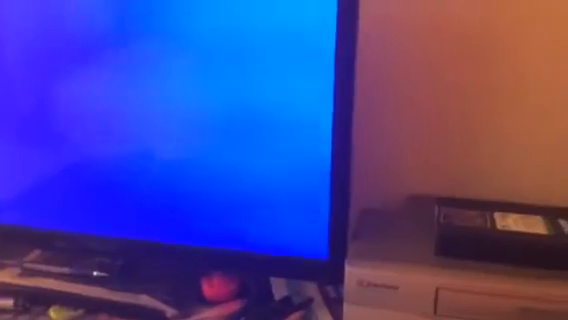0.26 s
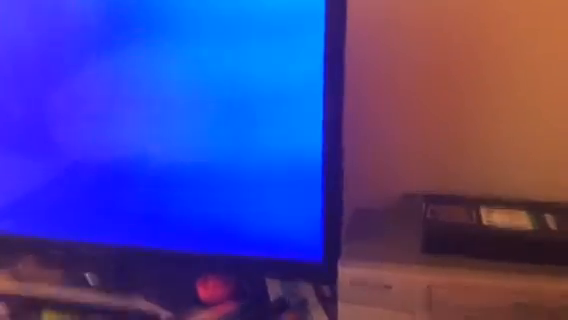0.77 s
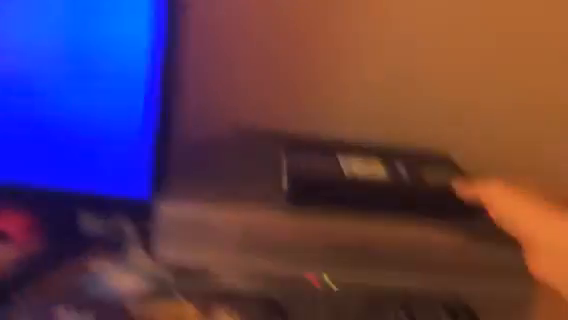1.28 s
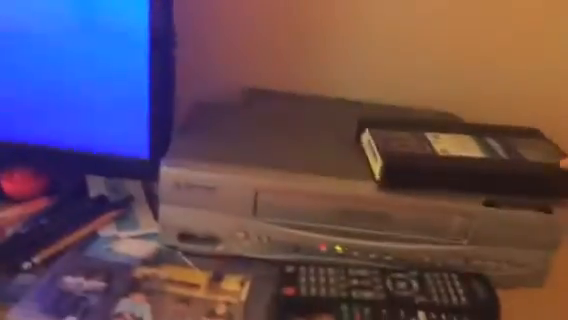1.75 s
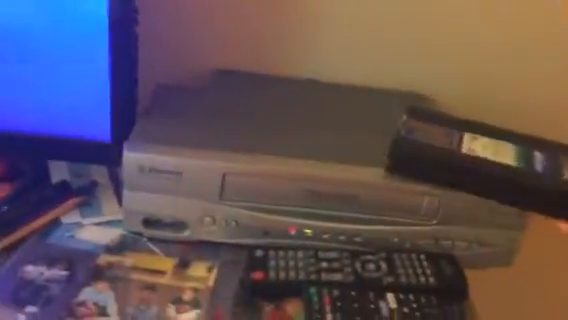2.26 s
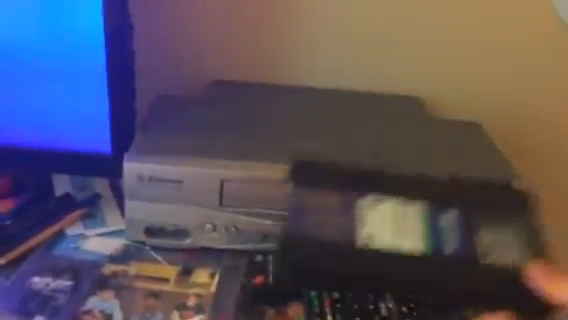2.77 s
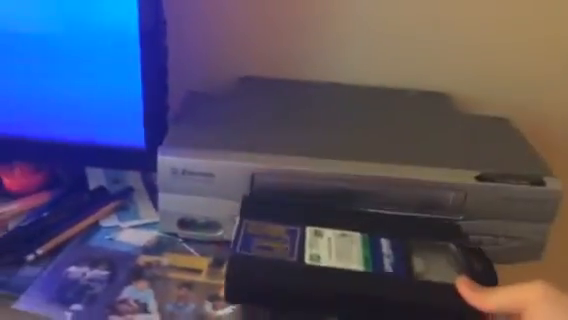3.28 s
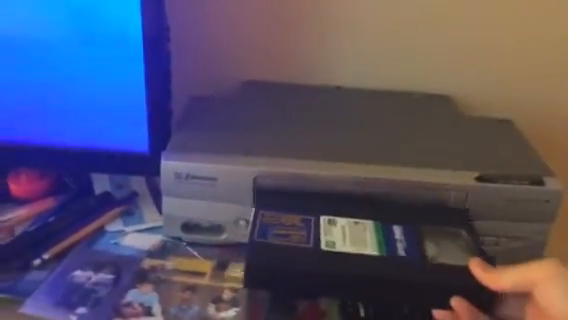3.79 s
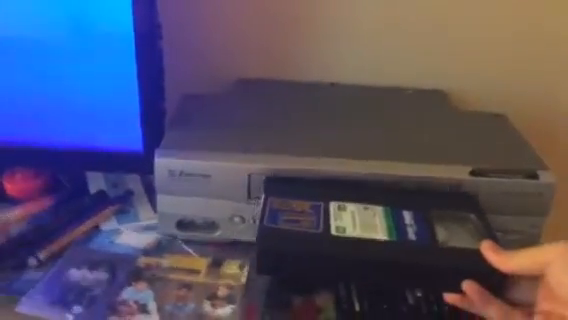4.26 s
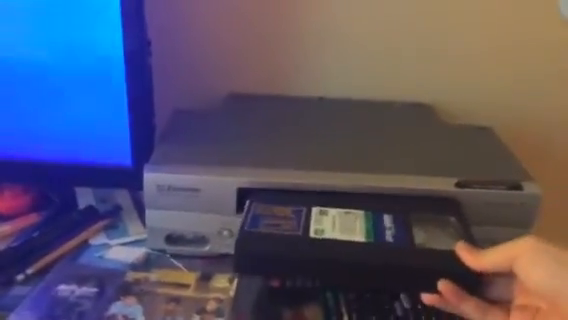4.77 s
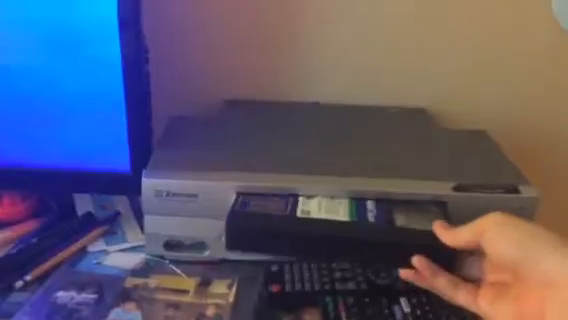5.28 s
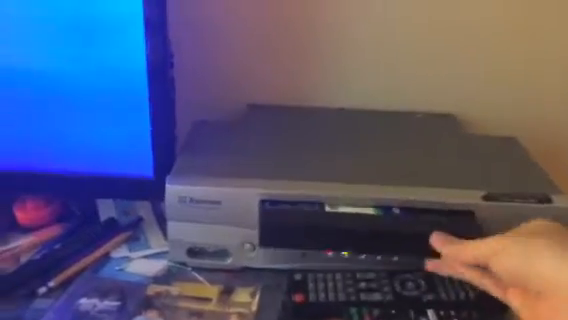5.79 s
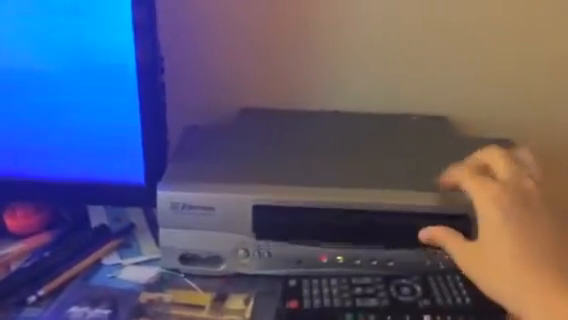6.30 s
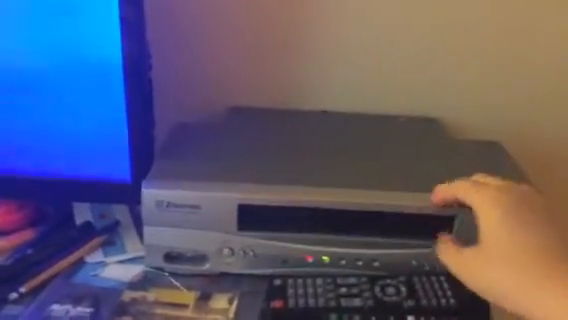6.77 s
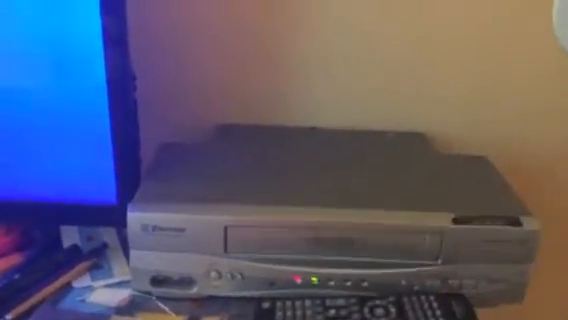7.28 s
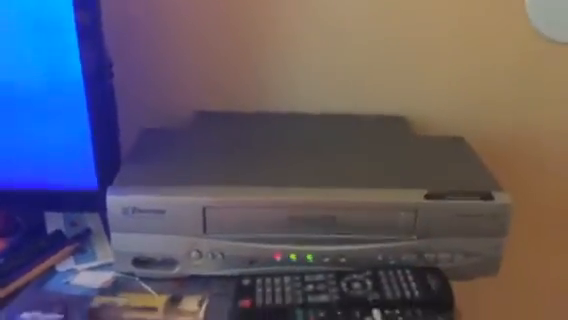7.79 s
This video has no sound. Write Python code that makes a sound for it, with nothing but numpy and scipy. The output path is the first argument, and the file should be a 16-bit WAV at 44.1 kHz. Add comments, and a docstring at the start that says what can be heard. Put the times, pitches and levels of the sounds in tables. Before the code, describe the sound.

Close in a small quiet room with a soft hush, faint taps lead to a hollow plastic cassette scraping across a player lid. It knocks against the front slot, pauses with small fumbling clicks, then goes in with a dense burst of bright clatter. Light ticks follow, a sharp latch snap, then a grinding clunk as the carriage drops and the flap shuts. Handheld microphone at arm's length, short dull room tail.

```python
"""Small quiet room: a hand drags a plastic video cassette off a player, fumbles it into the front slot
and pushes; the carriage clatters, latches, drops it home and the flap shuts, at arm's length.
Noise makes every contact: short chatters for blows, stick-slip grit for rubbing, both rung through the
resonances of shell or carriage. Singing edges and springs join them in a short room tail.
Soft bumps, dry snaps at the microphone case and a steady hush with a low rumble are laid over that."""
import sys
import numpy as np
from scipy import signal
from scipy.fft import rfft, irfft
from scipy.io import wavfile
from scipy.ndimage import uniform_filter1d

SR = 44100
rng = np.random.default_rng(int(sys.argv[2]) if len(sys.argv) > 2 else 0)


def log_audio(samples):
    """Write samples as a 16-bit WAV file to the path given in sys.argv[1]."""
    # one column per channel
    frames = np.atleast_2d(samples).T
    # limit to full scale, then quantise
    limited = np.clip(frames, -1, 1)
    pcm = np.round(limited * 32767).astype(np.int16)
    wavfile.write(sys.argv[1], SR, pcm)


N = 354784  # samples, about 8 s
GRID_HZ = np.maximum(np.fft.rfftfreq(8192, 1 / SR), 1)
# All source levels are set before the room and the microphone colour.


def undb(db):
    """Gain of a dB value."""
    return 10 ** (np.asarray(db) / 20)


def causal(x, gain):
    """Minimum-phase filter with this gain on the frequency grid, made by folding the cepstrum."""
    cepstrum = irfft(np.log(gain))
    cepstrum[1:4096] *= 2
    cepstrum[4097:] = 0
    impulse = irfft(np.exp(rfft(cepstrum)))[:4096]
    return signal.fftconvolve(x, impulse)[:len(x)]


def colour(x, points):
    """Filter through (Hz, dB) points, joined along log frequency."""
    hz, db = np.transpose(points)
    return causal(x, undb(np.interp(np.log(GRID_HZ), np.log(hz), db)))


def bandpass(x, edges_hz):
    """Gentle band-pass between two edges."""
    return signal.sosfilt(signal.butter(2, edges_hz, "band", fs=SR, output="sos"), x)


def ring(x, modes, dense_db, spot_db=0):
    """Resonances (Hz, width Hz, dB) over a flat response for the many modes too close to tell apart."""
    hz, width, db = np.transpose(modes)[:, :, None]
    f = GRID_HZ
    peaks = undb(db + spot_db) ** 2 * (f * width) ** 2 / ((hz ** 2 - f ** 2) ** 2 + (f * width) ** 2)
    return causal(x, np.sqrt(undb(dense_db) ** 2 + peaks.sum(axis=0)))


# the four bands of every contact, in order thud, knock, clack, tick: low_hz [Hz], high_hz [Hz]
CONTACT_BANDS = [(140, 600), (600, 2000), (2000, 6000), (6000, 16000)]


def split(x):
    """Thud, knock, clack and tick bands; alternate signs so that neighbours join without a notch."""
    return np.array([(-1) ** k * bandpass(x, edges) for k, edges in enumerate(CONTACT_BANDS)])


def walk(rate):
    """Random levels held 1 / rate s and slewed; spread near 1."""
    hold = int(SR / rate)
    levels = rng.standard_normal(N // hold + 1)
    return uniform_filter1d(np.repeat(levels, hold), hold)[:N]


def blows(table, modes, thud_db, part_db, dense_db, part_width_hz, thud_slower):
    """Each blow is a short chatter of contacts that strikes the body at a new spot and rings one loose part."""
    out, t = np.zeros(N + SR), np.arange(SR // 5) / SR
    for s, clack_db, body_db, tick_db, t60, part_hz in table:
        rise_s = 0.1 * t60  # long chatters are scuffs that build up, hold, then die
        after = np.maximum(t - 2 * rise_s, 0) / t60
        uneven = undb(5.1 * rng.standard_normal(len(t)))
        contacts = rng.standard_normal(len(t)) * uneven * np.minimum(t / rise_s, 1) ** 2
        spot_db = 4 * rng.standard_normal((len(modes), 1))
        chatter = contacts * undb(-60 * after)
        bands = split(ring(chatter, modes, dense_db, spot_db))
        # the whole box keeps shaking after the contacts have stopped
        shake = contacts * undb(-60 * after / thud_slower)
        bands[0] = split(ring(shake, modes, dense_db, spot_db))[0]
        bands[3] *= undb(-40 * after)  # the treble dies first
        loose_part = ring(chatter, [(part_hz, max(part_width_hz, part_hz / 12), 0)], -67)
        parts = np.vstack([bands, loose_part])
        peak_db = clack_db + np.array([body_db + thud_db, body_db, 0, tick_db, part_db])
        gains = undb(peak_db) / np.abs(parts).max(axis=1)
        start = int((s - rise_s * 0.97) * SR)
        out[start:start + len(t)] += gains @ parts
    return out[:N]


def strokes(tables, thud_db, most_thud_db, clack_db):
    """Thud, knock and clack dB per sample, led by the knock; the thud stops rising at the box's fullest shake."""
    t, knock = np.arange(N) / SR, np.full(N, -200.)  # silent between strokes
    for rows in tables:
        s, db = np.transpose(rows)
        on = (t >= s[0]) & (t <= s[-1])
        knock[on] = np.interp(t[on], s, db)
    return np.array([np.minimum(knock + thud_db, most_thud_db), knock, knock + clack_db])


def rub(strokes_db, modes, grit_db, judder_db, tick_db, shift_db):
    """Stick-slip grains of uneven size come in judders; the contact spot travels, so each mode swells alone."""
    judder = judder_db * (walk(25) + walk(90) + walk(350))
    grit = rng.standard_normal(N) * undb(grit_db * rng.exponential(size=N) + judder)
    body = undb(-10) * grit  # the many close modes
    for k, mode in enumerate(modes):
        swell = undb(shift_db * walk(18))
        body = body + (-1) ** k * swell * ring(grit, [mode], -37)
    parts = split(body)
    thud_db, knock_db, clack_db = strokes_db
    levels = undb([thud_db, knock_db, clack_db, clack_db + tick_db])
    gains = uniform_filter1d(levels, size=400)  # strokes start softly
    # the hand sets the slow level, the grit only the quick one
    steady = np.sqrt(uniform_filter1d(parts ** 2, size=6000))
    return np.sum(gains * parts / steady, axis=0)


# tone of the room's hush, shape only: pitch_hz [Hz], level_db [dB per Hz, relative]
HUSH_TONE = [(20, -12), (50, -7.5), (150, -9), (700, -9), (1000, -9), (2000, -14), (2600, -18.5),
             (4000, -25), (6300, -22), (10000, -26), (15500, -29.5)]
HUSH_DB, RUMBLE_DB = -67.5, -85.0  # rms, around which both waver


def air():
    """Steady hush of the room and a low rumble that wavers."""
    hush = colour(rng.standard_normal(N), HUSH_TONE) * undb(0.14 * walk(2.89))
    rumble = bandpass(rng.standard_normal(N), (40, 80))
    rumble_gain = undb(RUMBLE_DB + 3.7 * walk(29))
    return undb(HUSH_DB) * hush / hush.std() + rumble_gain * rumble / rumble.std()


ROOM_T60_S, ROOM_DB = 0.19, -7.5  # decay, and tail energy against the direct sound


def room(x):
    """Close walls and furniture return a short dull tail."""
    t = np.arange(SR // 2) / SR
    tail = colour(rng.standard_normal(len(t)), [(100, -2.5), (2000, -7.0), (12000, -9)])
    tail *= undb(-60 * t / ROOM_T60_S) * np.minimum(t / 0.003, 1)
    tail /= np.sqrt(np.sum(tail ** 2))
    return x + undb(ROOM_DB) * signal.fftconvolve(x, tail)[:N]


# soft bumps through hand and furniture: start_s [s], peak_db [dB], pitch_hz [Hz], t60_s [s]
SOFT_BUMPS = [(0.12, -47, 400, 0.06), (0.526, -46, 330, 0.11), (2.25, -61, 60, 0.13),
              (2.579, -47.5, 250, 0.039), (2.63, -56, 108, 0.073), (4.263, -51, 250, 0.03),
              (4.551, -57, 60, 0.078), (4.964, -43, 90, 0.052), (5.06, -49, 207, 0.16), (5.1, -51, 55, 0.7),
              (6.277, -48.5, 206, 0.064), (7.121, -40.5, 58, 0.38), (7.14, -30.5, 157, 0.11)]


def bumps():
    """Padded blows: a dull shake around one low, lossy mode."""
    out, t = np.zeros(N + SR), np.arange(SR // 3) / SR
    for s, db, hz, t60 in SOFT_BUMPS:
        push = rng.standard_normal(len(t)) * undb(-60 * t / t60) * np.minimum(t / 0.0012, 1)
        shake = bandpass(push, (hz * 0.37, hz * 2.0))
        start = int(s * SR)
        out[start:start + len(t)] += undb(db) * shake / np.abs(shake).max()
    return out[:N]


# dry snaps right at the microphone's case: start_s [s], ring_level_db [dB], case_ring_hz [Hz]
CASE_SNAPS = [(1.186, -42, 8400), (2.7462, -39, 950), (3.275, -52, 8500), (4.615, -39, 1070)]
SNAP_TURNS, SNAP_EDGE_DB, SNAP_EDGE_S = 0.93, -6.5, 0.00085  # ring decay in cycles; edge gain and decay


def snaps():
    """One sharp contact: a bright edge and a ring gone in a few turns; too near to stir the room."""
    out, t = np.zeros(N + SR), np.arange(SR // 50) / SR
    for s, db, hz in CASE_SNAPS:
        bright = colour(rng.standard_normal(len(t)), [(2500, 6.5), (12000, 2)])
        edge = undb(SNAP_EDGE_DB) * bright * np.exp(-t / SNAP_EDGE_S)
        case_ring = np.sin(2 * np.pi * hz * t) * np.exp(-t * hz / SNAP_TURNS)
        start = int(s * SR)
        out[start:start + len(t)] += undb(db) * (edge + case_ring)
    return out[:N]


# edges and springs that sing on one resonance while they are rubbed or shaken:
# start_s [s], end_s [s], pitch_hz [Hz], width_hz [Hz], middle_level_db [dB rms, before the roughness]
SINGING_EDGES = [(0.718, 1.25, 3130, 250, -68.5), (0.728, 1.25, 4780, 300, -75),
                 (1.225, 1.527, 3220, 300, -46.5), (1.883, 2.105, 1956, 307, -40),
                 (2.298, 2.383, 1550, 200, -49.5), (3.742, 3.83, 670, 79.6, -64.5),
                 (3.83, 4.14, 2900, 400, -70), (3.95, 4.123, 4600, 300, -71.5),
                 (5.007, 5.014, 2900, 250, -27.5), (5.06, 5.065, 2870, 250, -23.5),
                 (6.517, 6.563, 2210, 350, -49), (6.698, 6.82, 1260, 80, -66),
                 (6.82, 6.876, 1860, 350, -41), (7.054, 7.156, 2420, 200, -46),
                 (7.075, 7.132, 1353, 250, -40.5)]


def sings():
    """Grit through one narrow resonance, swelling and fading over the stroke."""
    out, rough = np.zeros(N), undb(1.9 * walk(60))
    for s0, s1, hz, width, db in SINGING_EDGES:
        a, b = int(s0 * SR), int(s1 * SR)
        narrow = ring(rng.standard_normal(SR), [(hz, width, 0)], -60)
        tone = ring(narrow, [(hz, 3 * width, 0)], -60)[:b - a]  # a wider pass clears the skirts
        swell = np.sin(np.linspace(0, np.pi, b - a))
        out[a:b] += undb(db) * tone / tone.std() * swell * rough[a:b]
    return out


# resonances of the cassette shell: pitch_hz [Hz], width_hz [Hz], level_db [dB]
SHELL_MODES = [(217, 25, -8.5), (314, 41, 6), (448, 54, 2.5), (615, 34, 4.5), (888, 95, -2), (1164, 214, 0),
               (1560, 160, -5), (1710, 264, -1), (2133, 110, -5), (2330, 106, -2), (3200, 92, 0.5),
               (4460, 180, -2.5)]
# blows on the shell: start_s [s], clack_peak_db [dB], body_db [dB against the clack],
# tick_db [dB against the clack], chatter_t60_s [s], loose_part_hz [Hz]
SHELL_TAPS = [(0.1184, -53, 5, -2, 0.048, 1430), (0.1428, -52, 0.5, -14, 0.059, 1100),
              (0.7393, -60.5, 5, -16, 0.029, 1200), (0.8577, -58, 1, 0, 0.025, 1120),
              (1.1846, -48.5, 4, 14.5, 0.021, 1130), (2.1444, -44.5, 5.5, -4, 0.034, 1630),
              (2.4501, -43, 7.5, -29, 0.041, 1190), (2.4827, -38, 1, -22, 0.044, 1210),
              (3.481, -26.5, -7.5, -7.5, 0.05, 4670), (3.577, -57, -15, 7, 0.02, 4900),
              (3.66, -51.5, -24, 7, 0.027, 4800), (3.8288, -39.5, -1.5, -35, 0.035, 1250),
              (4.1943, -35, -8.5, -20, 0.043, 2740), (4.3847, -39.5, 7, -30, 0.041, 1470),
              (4.3954, -35, -2, -25, 0.039, 1250), (4.4463, -41, 4.5, -14, 0.054, 1700),
              (4.806, -64, 15, -25, 0.029, 1130)]
# cassette sliding over the lid, a nudge and then the long pull: time_s [s], knock_level_db [dB rms]
LID_DRAG = [
    [(0.45, -92), (0.532, -59), (0.61, -77), (0.65, -75)],
    [(0.72, -89), (0.745, -63), (0.83, -83), (0.852, -59.5), (0.95, -68), (1.15, -66), (1.216, -52.5),
     (1.354, -40.5), (1.544, -42.5), (1.668, -49.5), (1.846, -54), (1.872, -60), (1.944, -42), (2.04, -47),
     (2.098, -53.5), (2.2, -56.5), (2.25, -46.5), (2.3, -57.5), (2.33, -50), (2.385, -55), (2.43, -66.5),
     (2.476, -57.5), (2.495, -45), (2.534, -82), (2.56, -71)],
]


def cassette():
    """The hollow shell is knocked about and dragged over the lid; both ring the same plastic modes."""
    taps = blows(SHELL_TAPS, SHELL_MODES, thud_db=-8.5, part_db=-9, dense_db=0.5,
                 part_width_hz=84, thud_slower=3.3)
    drag_db = strokes(LID_DRAG, thud_db=5.5, most_thud_db=-52.5, clack_db=-4.5)
    return taps + rub(drag_db, SHELL_MODES, grit_db=2.34, judder_db=0.72, tick_db=-19.5, shift_db=3.25)


# resonances of the carriage: pitch_hz [Hz], width_hz [Hz], level_db [dB]
CARRIAGE_MODES = [(208, 37, -4.5), (311, 33.5, 4), (429, 53, -6.5), (683, 49, -7), (906, 88, -5),
                  (1417, 100, -3), (1758, 29, -7.5), (2410, 50, -1), (2910, 120, -14), (3830, 110, -12.5),
                  (4810, 48, -8.5), (8150, 710, -2.5)]
# blows in the slot, carriage and flap: start_s [s], clack_peak_db [dB], body_db [dB against the clack],
# tick_db [dB against the clack], chatter_t60_s [s], loose_part_hz [Hz]
PLAYER_CLACKS = [(5.003, -38.5, 4.5, -10, 0.037, 2880), (5.009, -29, -4, -8, 0.02, 2880),
                 (5.031, -32.5, 4.5, -7, 0.045, 2860), (5.0523, -34, 8.5, 5, 0.047, 1880),
                 (5.063, -20, -7.5, -3, 0.028, 2900), (5.0765, -33.5, 4.5, 2, 0.048, 2730),
                 (5.1006, -21, -5.5, -5, 0.02, 3070), (5.1221, -29.5, 0.5, -13, 0.042, 2610),
                 (5.1468, -26, -9.5, -7, 0.035, 2780), (5.1728, -39.5, 3, -15, 0.063, 2170),
                 (5.1972, -34, -2.5, -16, 0.03, 2900), (5.216, -41, 2.5, -7, 0.03, 3100),
                 (5.3303, -42.5, 5.5, -10, 0.03, 3020), (5.3464, -43.5, -9, -1.5, 0.03, 2370),
                 (5.4026, -47.5, 10.5, -4, 0.032, 2890), (5.4259, -37, -5.5, -20, 0.032, 3200),
                 (5.49, -25.5, -1, 5, 0.023, 3260), (5.4948, -24.5, -6, -1, 0.024, 3400),
                 (5.7253, -53.5, -2, -15, 0.027, 1880), (6.0467, -42, 1, -14, 0.022, 3360),
                 (6.2742, -52.5, -5, -18, 0.026, 4130), (6.298, -36, -4, -3.5, 0.052, 4700),
                 (6.3059, -31.5, -17, -18, 0.035, 4600), (6.3659, -41, -3, 0, 0.029, 4660),
                 (6.4148, -42.5, -19, -15, 0.041, 4020), (6.43, -43, -8, -6, 0.021, 4070),
                 (6.441, -47, 4, -16, 0.055, 1680), (6.457, -47, -11, -4, 0.016, 3000),
                 (6.4702, -46, -11, 8, 0.02, 1620), (6.5022, -40, -3.5, -22, 0.027, 1800),
                 (6.524, -30, -13, -27, 0.027, 2050), (6.7082, -46, -8, -16, 0.035, 2540),
                 (6.8225, -17, -14, -7.5, 0.01417, 1790), (6.826, -22, -11.5, -9, 0.03, 2000),
                 (7.074, -39.5, -3, -8, 0.03, 2420), (7.118, -30, -2, -8, 0.025, 2420),
                 (7.1389, -19.5, -9, -12, 0.04, 1750), (7.321, -51, 6, 11, 0.026, 1720),
                 (7.4039, -37.5, 0.5, 0, 0.059, 2250), (7.445, -40, -2, 0, 0.04, 2240),
                 (7.4687, -45, 2, 4, 0.047, 2230), (7.7182, -51, -2, -4, 0.03, 4490)]
# cassette rubbing in the slot and the carriage travelling: time_s [s], knock_level_db [dB rms]
SLOT_TRAVEL = [
    [(3.5, -51), (3.58, -79.5), (3.78, -69.5), (4.1, -85), (4.19, -67), (4.3, -72), (4.38, -66),
     (4.53, -68), (4.65, -81), (4.74, -72), (4.77, -66.5), (4.88, -75.5), (4.98, -67), (5.02, -53),
     (5.16, -52), (5.23, -65), (5.34, -63), (5.54, -56), (5.72, -64.5), (5.77, -79), (5.88, -67),
     (5.93, -66.5), (6.116, -70.5), (6.2, -95.5), (6.328, -66.5), (6.448, -59), (6.632, -67), (6.802, -67),
     (6.9, -65), (6.95, -54), (7.022, -64.5), (7.316, -56.5), (7.5, -66.5), (7.72, -68), (7.86, -80),
     (8.04, -69)],
]


def player():
    """Slot, carriage and flap clatter while the cassette rubs its way in; all ring the carriage modes."""
    clacks = blows(PLAYER_CLACKS, CARRIAGE_MODES, thud_db=-6.5, part_db=-3.5, dense_db=-2,
                   part_width_hz=130, thud_slower=2.3)
    travel_db = strokes(SLOT_TRAVEL, thud_db=2.5, most_thud_db=-62.5, clack_db=-4)
    return clacks + rub(travel_db, CARRIAGE_MODES, grit_db=1.0, judder_db=2.15, tick_db=-8.5, shift_db=4.9)


# the carriage grinds down onto its seat: time_s [s], knock_level_db [dB rms]
SEAT_DROP = [
    [(7.04, -68), (7.076, -52), (7.098, -41.5), (7.15, -32.5), (7.246, -70.5), (7.26, -58)],
]


def seat():
    """Coarse, juddering grit rings the carriage as it drops home."""
    drop_db = strokes(SEAT_DROP, thud_db=-1.5, most_thud_db=-42.5, clack_db=1.4)
    return rub(drop_db, CARRIAGE_MODES, grit_db=1.95, judder_db=2.3, tick_db=-13.5, shift_db=4.9)


def scene():
    """Rubbing, blows and singing in the room; bumps, snaps and hush laid over without its tail."""
    in_room = cassette() + player() + seat() + sings()
    return (room(in_room) + bumps() + snaps() + air())[None]


# colour of the microphone's port and capsule: pitch_hz [Hz], level_db [dB]
MIC_COLOUR = [(20, -34), (45, 2.5), (100, 2), (3400, -1.5), (3900, -2.5), (4800, -1), (6200, -10.5),
              (7600, -5), (8500, 2.5), (10000, -9.5), (12200, -2), (13400, -10.5), (14500, -18),
              (16000, -11)]


def record(dry):
    """Microphone colour, then a steep cut of the top."""
    coloured = colour(dry[0], MIC_COLOUR)
    top_cut = signal.ellip(8, .2, 70, 15300, fs=SR, output="sos")  # passes up to 15300 Hz
    return signal.sosfilt(top_cut, coloured)[None]


dry = scene()
out = record(dry)
log_audio(out)
```